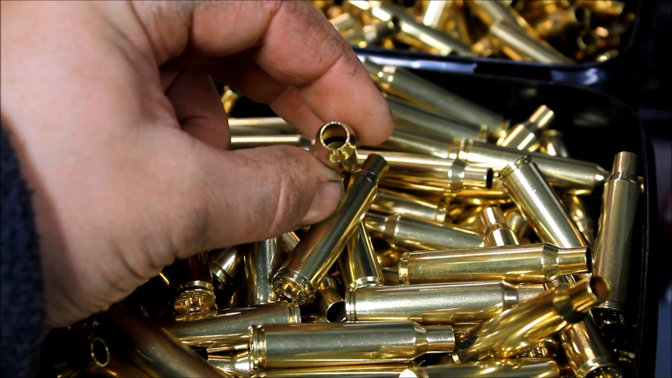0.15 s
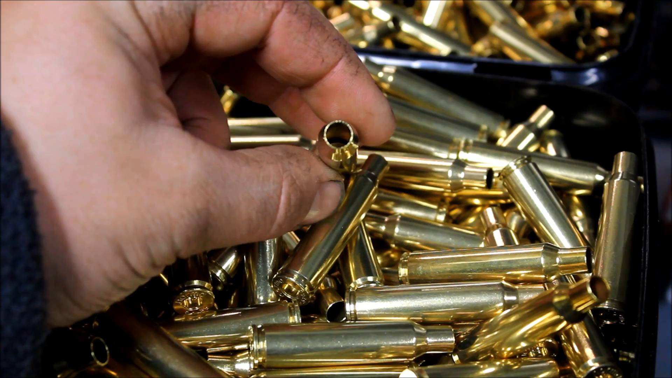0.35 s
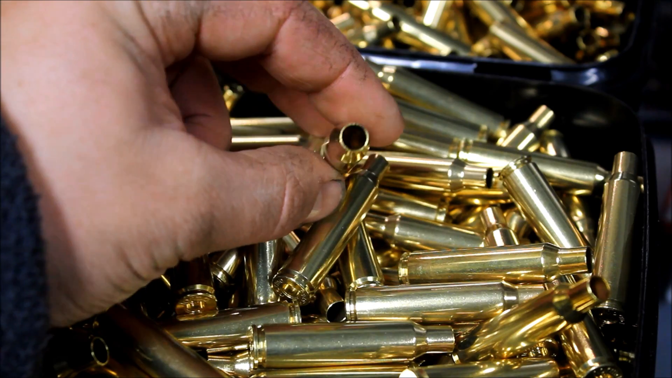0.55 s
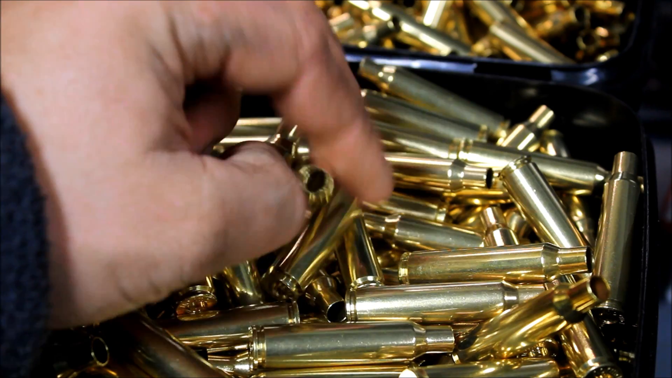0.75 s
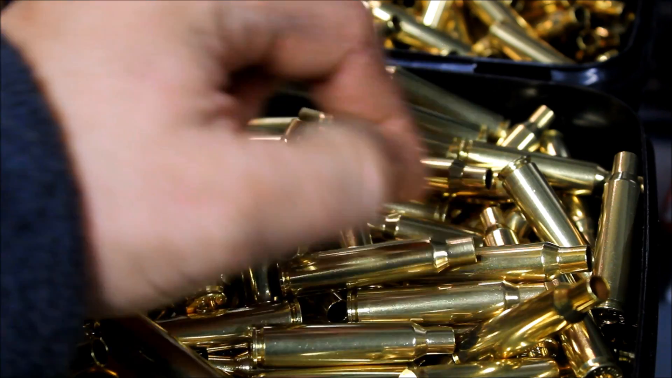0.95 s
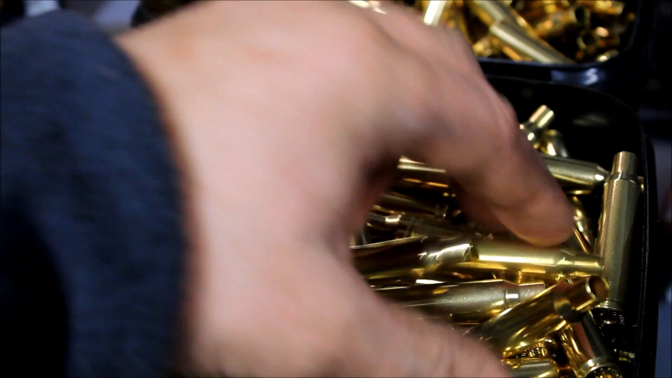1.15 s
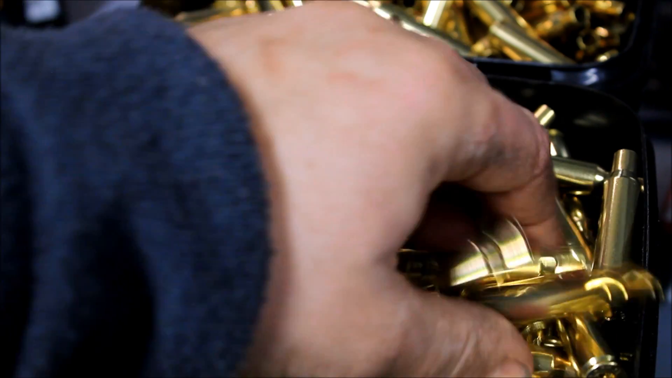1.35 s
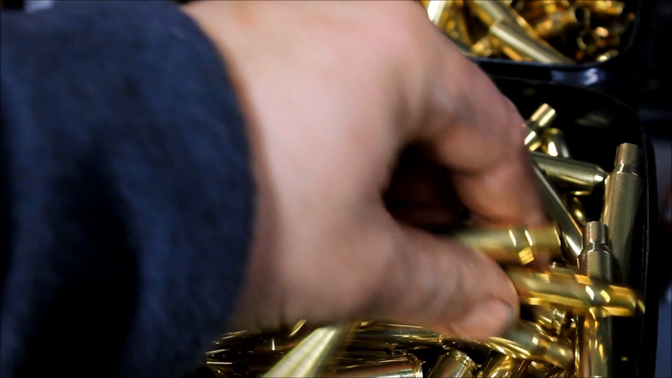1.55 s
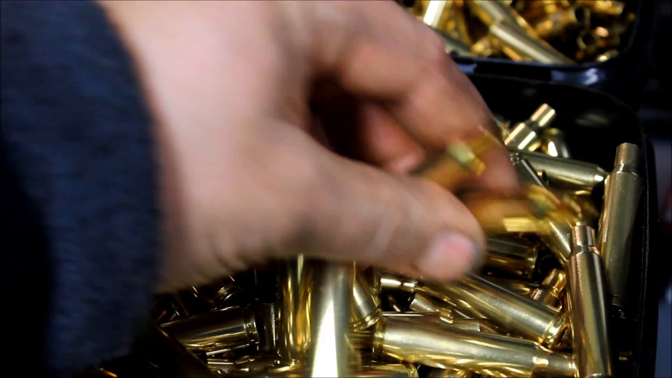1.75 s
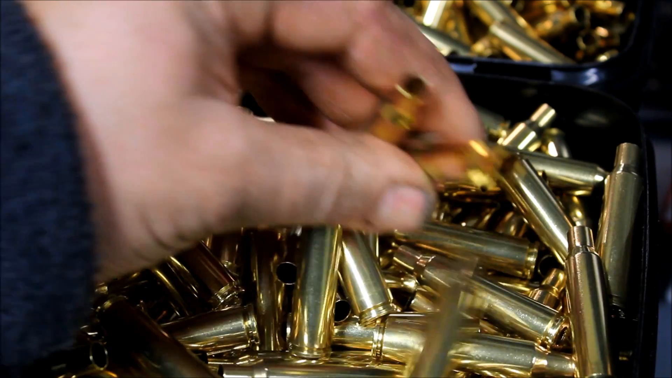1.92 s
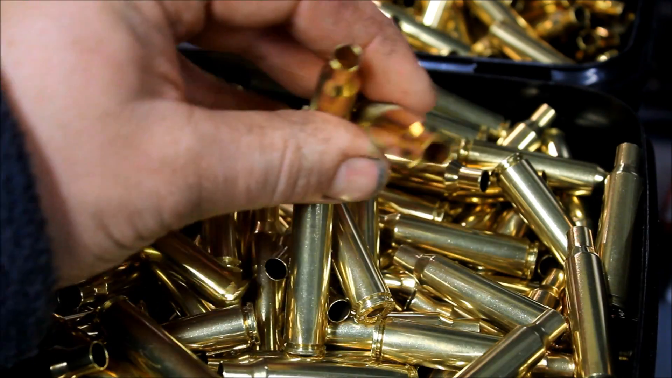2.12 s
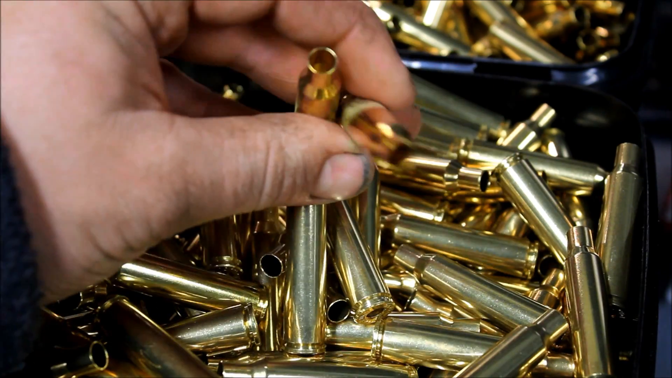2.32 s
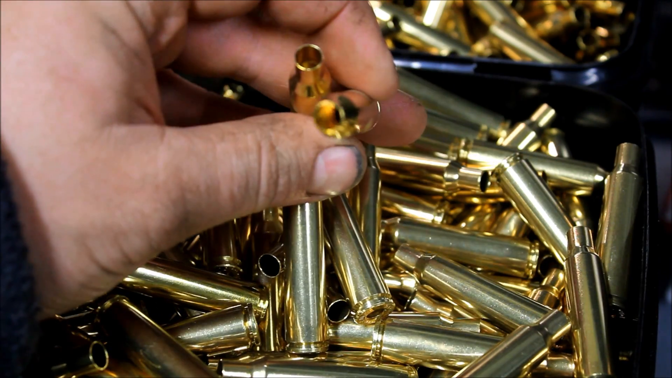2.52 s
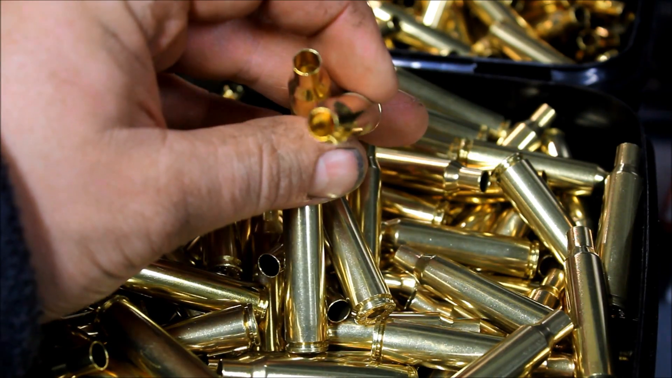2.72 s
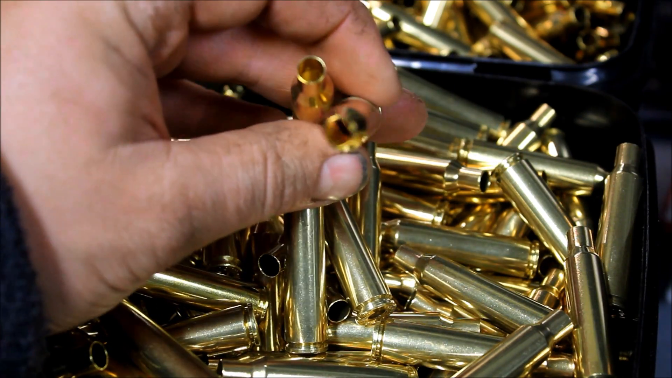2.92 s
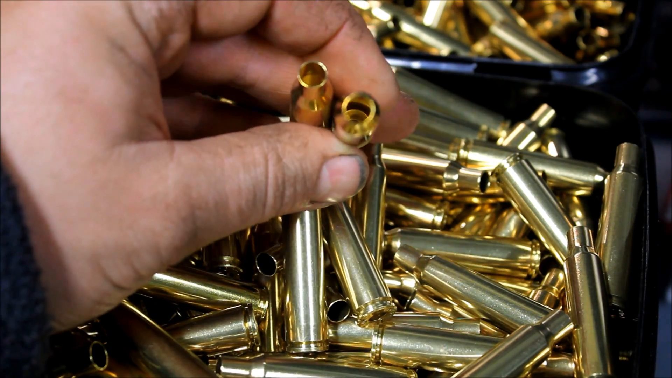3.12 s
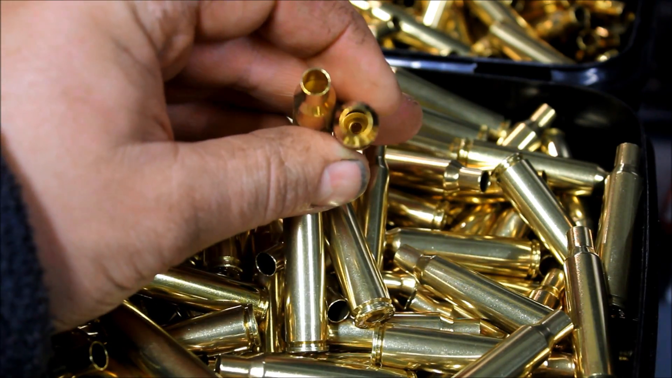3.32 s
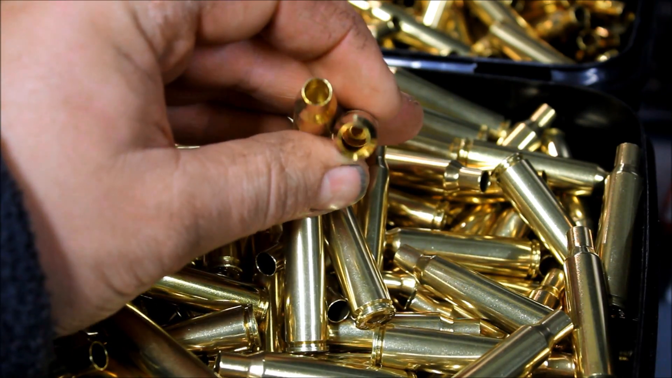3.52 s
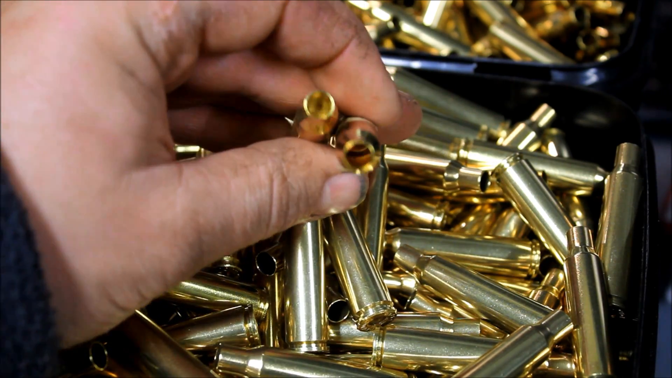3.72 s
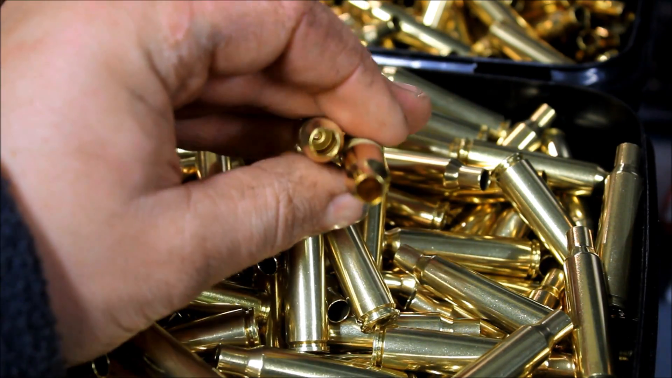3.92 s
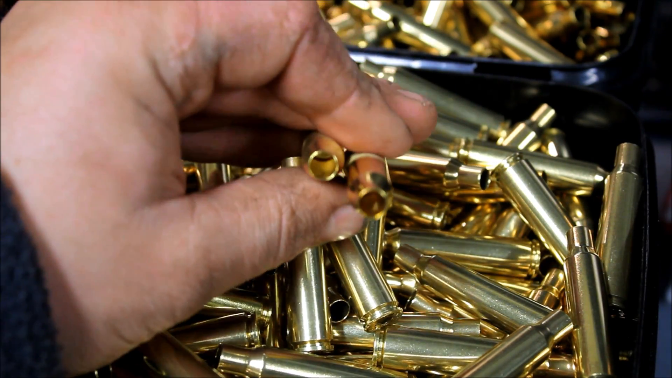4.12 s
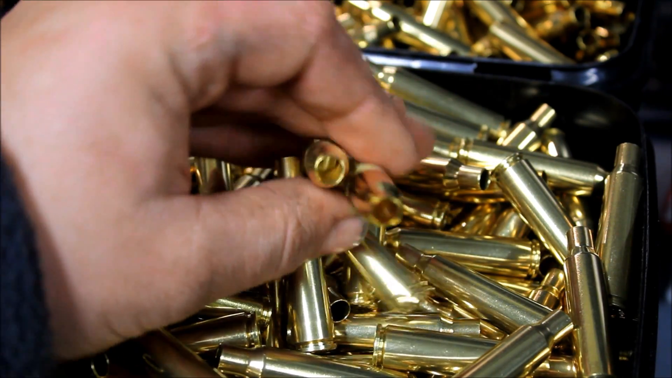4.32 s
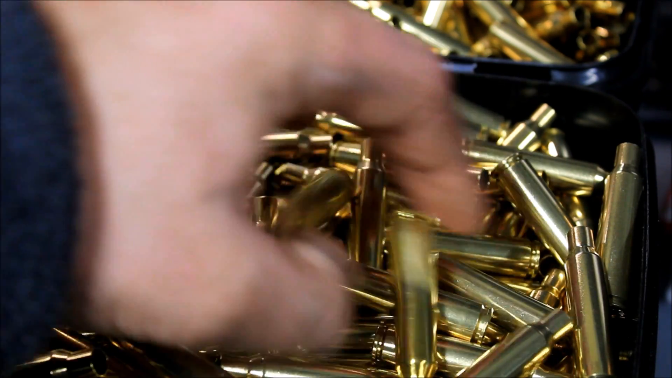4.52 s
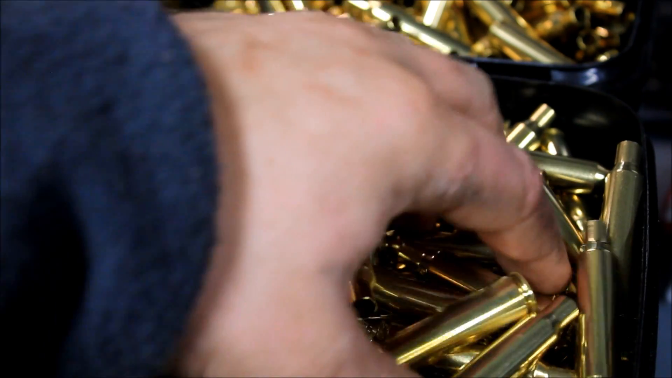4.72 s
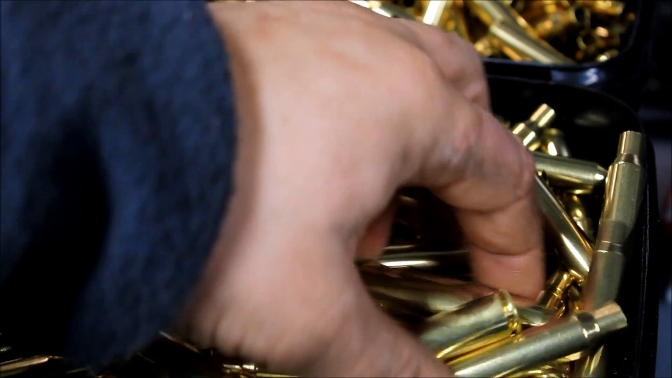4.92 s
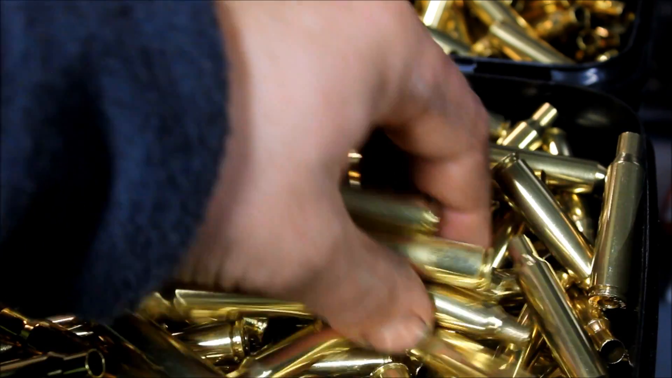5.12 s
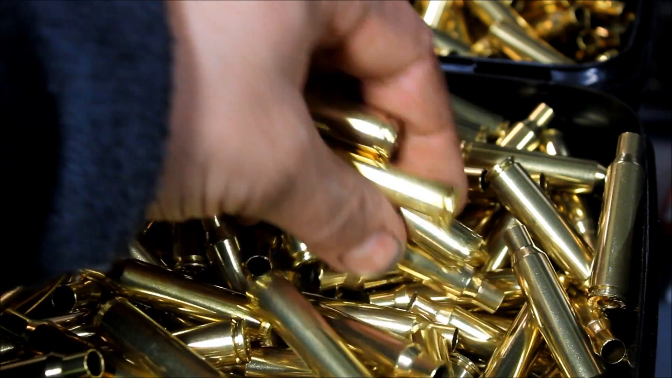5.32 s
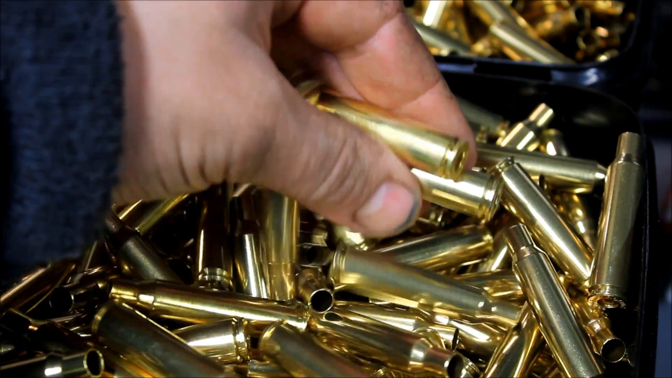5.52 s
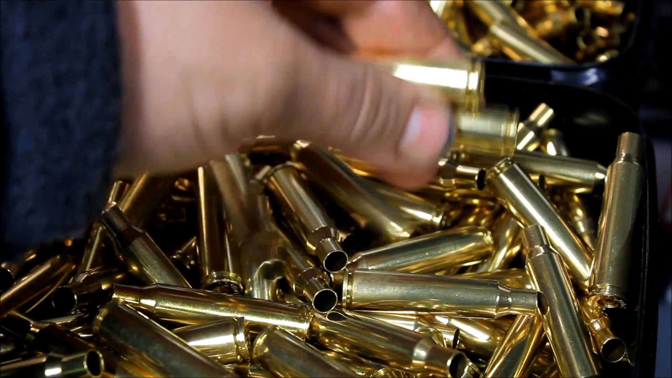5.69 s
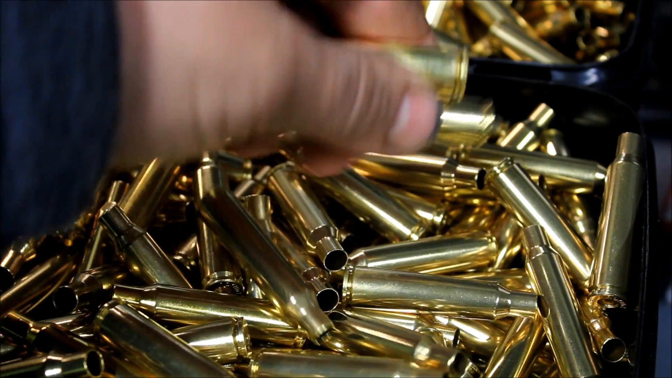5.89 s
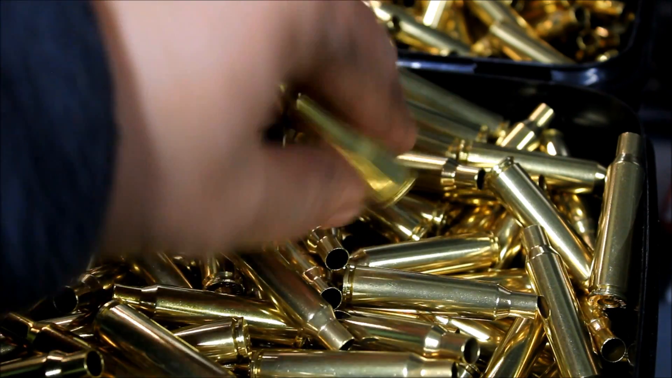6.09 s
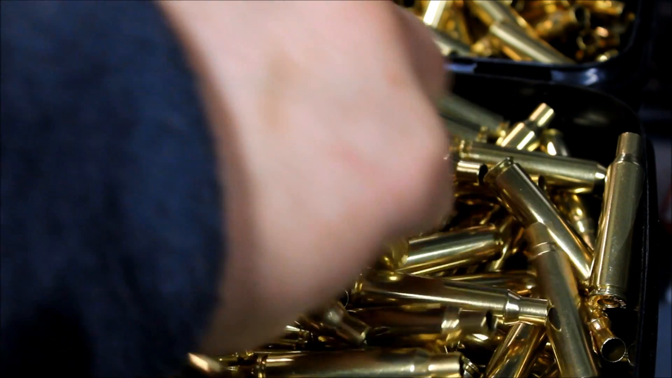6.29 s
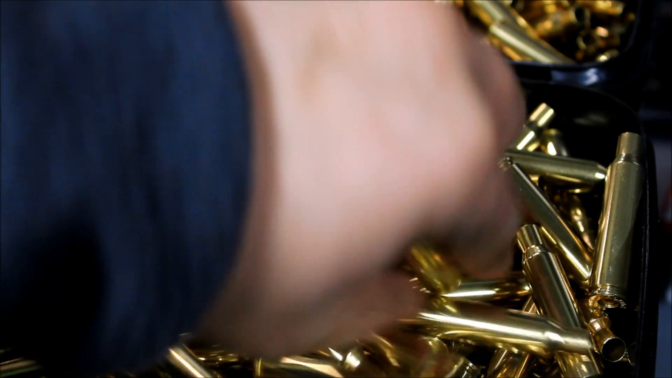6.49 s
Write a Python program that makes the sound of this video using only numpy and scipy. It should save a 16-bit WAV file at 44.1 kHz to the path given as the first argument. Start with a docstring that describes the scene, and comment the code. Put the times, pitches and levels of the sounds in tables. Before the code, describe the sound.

A hand stirs empty brass cartridge cases in a tub, setting off bright, ringing clinks over a rattle of tiny ticks. The clatter thins to a few soft, damped clicks while the fingers hold some cases. Then a longer, dense spell of rummaging follows, with a brief dip and one last flurry. The microphone is close, and a faint hum and workshop room noise lie underneath.

```python
"""Bright clinks and rattles: a hand drops, picks up and stirs empty brass cases in a tub.
Each blow is a short knock that rings three high tones in a case's thin wall, the air inside
it and the tub. Stirring makes a crowd of tiny ticks that ring the same way.
Mains hum and workshop noise lie underneath. The gain control of a nearby camera turns
everything down when the clatter is loud, so the background dips with it."""
import sys
import numpy as np
from scipy import signal
from scipy.fft import rfft, irfft, next_fast_len
from scipy.io import wavfile
from scipy.ndimage import uniform_filter1d

SR = 44100
rng = np.random.default_rng(int(sys.argv[2]) if len(sys.argv) > 2 else 0)


def wav_record(signal):
    """Record a signal, one row per channel, as 16-bit PCM in the file named by sys.argv[1]."""
    frames = np.transpose(np.atleast_2d(signal))
    bounded = np.clip(frames, -1, 1)
    # unit amplitude maps onto the largest positive 16-bit level
    quanta = np.round(bounded * 32767).astype(np.int16)
    wavfile.write(sys.argv[1], SR, quanta)


N = 288855

# Tones of a case's wall: f/Hz, level/dB, pitch spread between cases/fraction
WALL_TONES = [(9680, 0, .005), (12950, -1, .005), (15640, -9, .005)]
# Tones of the tub: f/Hz, level/dB, t60/s (the time a sound takes to fade by 60 dB)
TUB_TONES = [(232.8, -2, 0.16), (376, 1, 0.031), (519.4, -9, 0.2), (672.4, 4, 0.044), (887, 4.5, 0.036)]
# Tones of the air in the cases, open or half covered: f/Hz, level/dB, t60/s
AIR_TONES = [(1250, -5, .022), (1385, 0, .028), (1490, -1, .025)]


def amp(db):
    """Turns decibels into a factor to multiply a sound by."""
    return 10 ** (np.asarray(db) / 20)


def unit_level(x):
    """Scales a signal to an average power of 1."""
    return x / np.sqrt(np.mean(x ** 2) + 1e-20)


def colour(x, points):
    """Makes some pitches louder and others softer, along a curve of (f/Hz, level/dB) points."""
    size = next_fast_len(x.shape[-1])
    hz, db = np.transpose(points)
    gain = amp(np.interp(np.log(np.fft.rfftfreq(size, 1 / SR) + 1), np.log(hz), db))
    return irfft(rfft(x, size) * gain, size)[..., :x.shape[-1]]


def ring(x, hz, t60):
    """One ringing tone: each push in x starts a sine wave that dies away."""
    fade = 10 ** (-3 / (max(t60, .004) * SR))
    turn = 2 * np.pi * hz / SR
    return signal.lfilter([0, np.sin(turn)], [1, -2 * fade * np.cos(turn), fade * fade], x)


def body(x, tones):
    """A pushed object rings with all its tones at once."""
    return sum((-1) ** k * amp(db) * ring(x, hz, t60) for k, (hz, db, t60) in enumerate(tones))


def workshop():
    """Steady room noise and a mains hum whose tones waver."""
    # Colour of the room noise: f/Hz, relative level/dB
    room_colour = [(12, -46), (20, -24.5), (65, -23), (102, -13), (169, -23.5), (297, -5), (551, -16),
                   (729, -17), (994, -18), (1320, -15), (5210, -28.5), (13600, -39), (16500, -35)]
    # Tones of the hum: f/Hz, level/dB, width of the wavering/Hz
    hum_tones = [(24.82, -72.5, 1), (49, -75, 1), (100.8, -59.5, 0.29), (210.4, -63.5, 10),
                 (293.7, -55, 5.5), (473, -62, 8)]
    t = np.arange(N) / SR
    out = amp(-49.85) * unit_level(colour(rng.standard_normal(N), room_colour))
    for hz, db, width in hum_tones:
        drift = np.cumsum(rng.standard_normal(N)) * np.sqrt(2 * np.pi * width / SR)
        out += amp(db) * np.sqrt(2) * np.sin(2 * np.pi * hz * t + uniform_filter1d(drift, 400))
    return out


def knocks(tilts_db, chatter_t60, pile_db):
    """One noise burst per (low, high) tilt: a snap, uneven chatter, then scatter through the pile."""
    # Colour of brass hitting brass: f/Hz, relative level/dB
    knock_colour = [(100, -56), (200, -23.5), (600, -2.5), (1500, -2), (2500, -2.5), (4000, 0),
                    (6000, -5.5), (8500, -15.5), (10200, -2.5), (11700, -12), (13300, -7.5), (14400, -11.5),
                    (17000, -24)]
    snap_t60, pile_t60 = .0015, .13
    t = np.arange(6000) / SR
    log_hz = np.log(np.array(knock_colour)[:, 0])
    bursts = []
    for tilt_db in tilts_db:
        noise, lumps = rng.standard_normal((2, len(t)))
        snap = amp(6 - 60 * t / snap_t60)
        chatter = .51 * amp(5 * unit_level(uniform_filter1d(lumps, 50)) - 60 * t / chatter_t60)
        scatter = amp(pile_db - 60 * t / pile_t60)
        own_db = 3 * lumps[:len(knock_colour)]  # no two knocks have the same colour
        own_db += np.interp(log_hz, np.log([2500, 7000]), tilt_db)
        usual_level = np.sqrt(np.mean(colour(noise, knock_colour) ** 2))
        burst = colour(noise, knock_colour + np.outer(own_db, [0, 1])) / usual_level
        bursts.append(burst * (snap + chatter + scatter) / 2)
    return bursts


def stirring():
    """Cases slide under the hand and bump each other in many tiny ticks."""
    # One curve per hand movement: t/s, rattle level/dB, air level compared with the rattle/dB
    movements = [
        [(.6, -70, -26), (.798, -39.5, -30), (.984, -41, -22), (1.008, -24, -23), (1.028, -44, -17),
         (1.15, -65, -25)],
        [(1.225, -43.5, -15), (1.273, -28, -17), (1.421, -21, -29), (1.56, -27.5, -17), (1.843, -44, -22),
         (1.967, -20.5, -28), (2.08, -47, -20), (2.156, -33.5, -22), (2.292, -51.5, -23.5), (2.45, -73.5, -24)],
        [(2.55, -69.5, -22), (2.75, -64.5, -26.5), (2.89, -67, -17.5), (3.03, -72, -22)],
        [(3.05, -80.5, -27), (3.166, -55.5, -28), (3.25, -76, -24.5)],
        [(3.55, -81.5, -24.5), (3.734, -67.5, -24), (4.13, -65, -25.5), (4.25, -76.5, -21)],
        [(4.32, -67, -20), (4.426, -39, -19), (4.6, -29.5, -26), (4.724, -20.5, -25.5), (4.782, -29, -26),
         (4.942, -22.5, -29.5), (5.29, -22.5, -23.5), (5.312, -32.5, -26), (5.492, -32.5, -34),
         (5.558, -21, -23.5), (5.834, -29.5, -33), (5.92, -52.5, -22), (5.942, -38.5, -25), (6.1, -64, -7)],
        [(6.282, -38.5, -4), (6.312, -33, -16), (6.528, -24.5, -25), (6.55, -22, -30)],
    ]
    cases, base_ticks_per_s, wall_t60 = 20, 650, .18
    t = np.arange(N) / SR
    bunching = np.exp(1.1 * unit_level(uniform_filter1d(rng.standard_normal(N), 500)))
    ticks = amp(2 * np.minimum(rng.exponential(1, N), 4))
    ticks *= rng.random(N) < bunching * base_ticks_per_s / SR  # cases slip in bunches
    ticks /= np.sqrt(abs(uniform_filter1d(ticks ** 2, 2500)) + 1e-3)  # even out the loudness
    times, rattle_db, air_db = np.transpose([row for curve in movements for row in curve])
    level_db = np.interp(t, times, rattle_db)
    moving = sum((t > curve[0][0]) & (t < curve[-1][0]) for curve in movements)
    ticks *= moving * amp(level_db)
    effort_db = level_db + 38  # harder stirring gives the walls a bigger share, the tub a smaller one
    to_wall = ticks * amp(-27.5 + .26 * effort_db)
    to_tub = ticks * amp(-37.5 - .65 * effort_db)
    to_air = ticks * amp(np.interp(t, times, air_db))
    which_case = rng.integers(0, cases, N)
    rattle, walls = np.zeros((2, N))
    for k, knock in enumerate(knocks(np.zeros((cases, 2)), chatter_t60=.01, pile_db=-16)):
        hit = which_case == k
        rattle += signal.oaconvolve(ticks * hit, knock / np.linalg.norm(knock))[:N]
        for hz, db, spread in WALL_TONES:
            pushes = to_wall * hit * amp(db) * rng.standard_normal(N)
            walls += ring(pushes, hz * (1 + spread * rng.standard_normal()), wall_t60)
    tub = body(to_tub * rng.standard_normal(N), TUB_TONES)
    air = body(to_air * rng.standard_normal(N), AIR_TONES)
    return rattle + walls + tub + air


def blows():
    """Each clear blow and its bounces ring one case; its wall tones come in close, throbbing pairs."""
    # Blows: t/s, then level/dB of the knock, first wall tone, second wall tone, air inside, tub
    strikes = [(0.6195, -45.5, -44, -58, -46, -52), (0.7002, -34.5, -29.5, -45, -51, -55),
               (0.767, -28, -35, -30, -49, -58), (0.7873, -21.5, -31, -22, -55, -38.5),
               (0.8003, -20.5, -7, -13.5, -52, -46), (0.873, -10.5, -26, -14, -38, -27),
               (0.9009, -30.5, -19, -22, -49, -47), (0.941, -22.5, -20, -9, -51, -40.5),
               (0.9819, -29, -22, -26, -49, -43), (0.991, -13, -11.5, -11, -40, -32),
               (1.0062, -11, -40, -16, -35, -29), (1.049, -36.5, -28, -37, -35, -45),
               (1.226, -21.5, -6, -16, -55, -57), (1.249, -12, -25, -15, -29, -48),
               (1.2792, -18.5, -17, -5, -36, -33), (1.327, -6.5, -35, -25, -16, -26),
               (1.3857, -7, -11, -28, -27, -33), (1.4136, -5.5, -9, -23, -25.5, -35),
               (1.434, -7, 3.5, -8, -22.5, -49.5), (1.5749, -5, -9, -15.5, -21.5, -29.5),
               (1.647, -13.5, -3.5, -11, -35, -33), (1.6572, -2, -11, -6.5, -14.5, -22),
               (1.718, -18.5, -41, -56, -35.5, -42), (1.751, -10.5, 0.5, -3.5, -22, -38),
               (1.7882, -31, -11.5, -20, -42.5, -61), (1.8333, -16.5, -18, -13, -33.5, -46.5),
               (1.851, -10.5, -15, -33, -19.5, -34.5), (1.895, -25.5, -12.5, -12, -61.5, -49),
               (1.924, -20, -13, -9.5, -70, -37), (1.9449, -9.5, 0.5, -12.5, -36.5, -30.5),
               (1.971, -21.5, 1.5, -3, -19, -28), (2.1144, -30, -22, -28, -39, -45.5),
               (2.136, -24.5, -31, -22, -17, -50.5), (2.1706, -17.5, -13, -21, -38, -40.5),
               (2.1905, -22.5, -17, -34, -42, -58.5), (2.2804, -28, -20, -40.5, -59, -42.5),
               (2.288, -18.5, -27, -27, -42.5, -43), (2.3056, -14.5, -25.5, -14, -28.5, -48.5),
               (2.4683, -41.5, -55, -66.5, -69, -57), (2.507, -41, -58.5, -44.5, -49, -58.5),
               (2.629, -43, -62.5, -65.5, -45, -51), (2.7112, -42.5, -43.5, -44.5, -42, -56),
               (3.075, -39, -42.5, -42.5, -64.5, -58), (3.107, -36.5, -58, -55, -51, -51.5),
               (3.1533, -22, -21, -24, -50, -42.5), (3.7213, -43.5, -65.5, -71.5, -50, -54),
               (3.9432, -40, -43.5, -50, -54, -63), (4.0103, -37.5, -57, -51, -47, -59),
               (4.0547, -42, -47, -49.5, -57, -64.5), (4.1329, -25.5, -39, -43, -50.5, -48.5),
               (4.3238, -25.5, -58, -52, -28.5, -52), (4.398, -26, -34, -40, -37, -62),
               (4.4207, -16, -17, -16, -49, -45), (4.4438, -25, -23, -39, -43, -55),
               (4.4687, -7.5, -33, -14, -35, -31), (4.5015, -23.5, -5, -8, -30, -42),
               (4.5389, -11.5, -29, -14, -36.5, -29.5), (4.566, -28, -24, -21, -53, -53),
               (4.5833, -14.5, -18, -17, -34, -43), (4.6162, -15.5, -6.5, -14, -43, -33),
               (4.6977, -12.5, -36, -12, -31, -41), (4.7265, -9, -10, -29, -16.5, -30),
               (4.7613, -11.5, -7, -14, -10.5, -39), (4.8488, -14, -30, -9.5, -23, -53),
               (4.9092, -29.5, -8.5, -22, -36, -55), (4.9479, -12, -14, -13, -49, -54),
               (4.996, -10.5, -30, -39, -28, -45), (5.039, -17.5, -1.5, -7, -66, -46),
               (5.0703, -6, -6, -9.5, -52, -40), (5.1256, -5.5, -17, -13, -30.5, -31.5),
               (5.147, -5.5, -3.5, -5.5, -17, -26.5), (5.1877, -8.5, -11, -10, -31, -47),
               (5.221, -6, -11, -3, -16.5, -32.5), (5.253, -18.5, -31, -22, -41, -56),
               (5.2686, -5.5, -38, -9, -26.5, -28), (5.2935, -8.5, 2.5, -8, -20, -27.5),
               (5.3273, -20.5, -2, -17.5, -54, -50), (5.3608, -20.5, -1.5, -13.5, -53, -43),
               (5.3841, -10, -4, -5, -38.5, -31.5), (5.3984, -14, -13, -27, -20, -25),
               (5.427, -12.5, -8, -14, -37, -44), (5.4945, -19, -12.5, -13.5, -43.5, -40.5),
               (5.5415, -12, -5, -18, -9.5, -31), (5.5577, -7, -15, -18, -37, -25.5),
               (5.5687, -5, -2, -6, -24, -21.5), (5.6148, -2.5, -19, -2, -15.5, -21),
               (5.6495, -18, -6, -21, -25, -41.5), (5.668, -7.5, 0.5, -1, -44.5, -24.5),
               (5.6884, -8, -8, -2, -32, -31.5), (5.7284, -13, -7, -27, -34, -31.5),
               (5.7646, -13, -7.5, -6, -29, -34), (5.7983, -12.5, -29, -1, -47.5, -24.5),
               (5.8299, -21, -26, -6.5, -42, -46), (5.846, -26.5, -10, -13.5, -53, -57),
               (5.9416, -22.5, -34.5, -64, -53, -54), (5.9674, -28.5, -40, -13, -41, -52),
               (6.0076, -25, -41, -20, -44.5, -57), (6.0342, -21, -26, -34, -40, -52),
               (6.2833, -18, -45, -39, -12, -50), (6.2968, -12, -28, -17, -16, -37),
               (6.3115, -14, -11, -12, -29, -47), (6.3865, -16, -7, -23, -42, -43),
               (6.3987, -13.5, -22, -22, -21.5, -53), (6.4329, -3.5, -9, -17, -23, -25),
               (6.5281, -15.5, -37, -20, -41, -23.5)]
    # Times when fingers hold the cases: start t/s, end t/s
    held_spans = [(0, .75), (2.4, 4.35)]
    wall_t60, bounce_t60, grip_t60, grip_pitch_rise = .082, .15, .18, .012
    out, t = np.zeros(N + SR), np.arange(9000) / SR
    rise = 1 - np.exp(-t / .003)  # the ring builds while the cases touch
    chances = rng.standard_normal((len(strikes), len(WALL_TONES), 3))
    bounces = .027 * rng.standard_normal((len(strikes), len(t))) * amp(-60 * t / bounce_t60)
    pushes = (t == 0) + bounces
    _, knocks_db, _, _, airs_db, _ = np.transpose(strikes)
    hollow_db = airs_db - knocks_db + 20.5  # above zero: more ringing air than usual
    bright_db = 4.5 - .73 * hollow_db + .43 * (knocks_db - knocks_db.mean())
    bursts = knocks(np.outer(bright_db, [-.5, .5]), chatter_t60=.05, pile_db=-8)
    for strike, knock, chance, push in zip(strikes, bursts, chances, pushes):
        start, knock_db, first_db, second_db, air_db, tub_db = strike
        t60 = wall_t60 * np.exp(.14 * chance[0, 2])
        third_db = second_db - 18.5 + 4 * chance[2, 2]
        held = any(begin < start < end for begin, end in held_spans)
        shape = rise * amp(-60 * t / grip_t60 * held)  # a grip cuts the ring short
        sound = amp(tub_db) * body(push, TUB_TONES) + amp(air_db) * body(push, AIR_TONES)
        sound[:len(knock)] += amp(knock_db) * knock
        walls_db = first_db, second_db, third_db
        for (hz, _, spread), db, (detune, gap, _) in zip(WALL_TONES, walls_db, chance):
            pitch = hz * (1 + spread * detune + grip_pitch_rise * held)  # a grip stiffens the wall
            pair = ring(push, pitch, t60) + .5 * ring(push, pitch * (1 + .007 * gap), t60)
            sound += amp(db) * shape * pair
        out[round(start * SR):][:len(sound)] += sound
    return out[:N]


def scene():
    """The clatter over the workshop's background; a small tub sends out no deep bass."""
    no_bass = signal.butter(5, 185, "high", fs=SR, output="sos")
    clatter = signal.sosfilt(no_bass, blows() + stirring())
    return (clatter + workshop())[None]


def record(dry):
    """The camera slowly turns loud moments down, clips peaks, adds hiss and cuts the highest treble."""
    follow_s, limit_db, hiss_db = .28, -24, -63.5
    dull_hz, edge_hz = 15950, 17205
    memory = np.exp(-1 / (follow_s * SR))
    power_db = 10 * np.log10(signal.lfilter([1 - memory], [1, -memory], dry[0] ** 2) + 1e-12)
    cut_db = .7 * np.maximum(power_db - limit_db, 0)
    turned_down = np.clip(dry / amp(cut_db), -1, 1)
    hiss = amp(hiss_db) * rng.standard_normal(dry.shape)
    dull, edge = (signal.firwin(511, hz, window=("kaiser", 9), fs=SR) for hz in (dull_hz, edge_hz))
    treble_cut = dull + .04 * (edge - dull)  # only a trace passes between the two
    return signal.oaconvolve(turned_down + hiss, treble_cut[None], "same")


dry = scene()
out = record(dry)
wav_record(out)
```